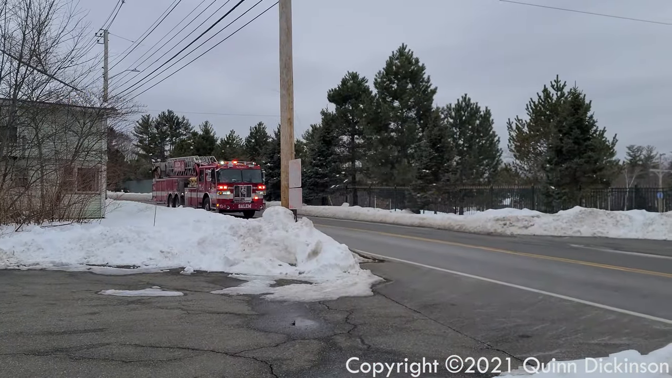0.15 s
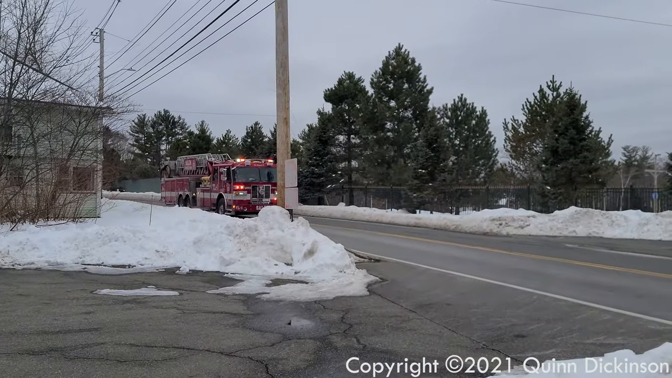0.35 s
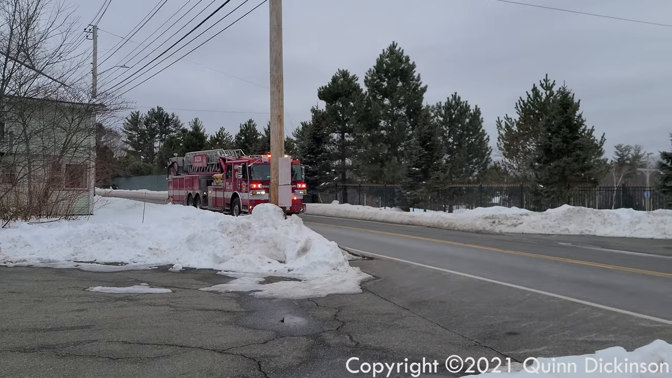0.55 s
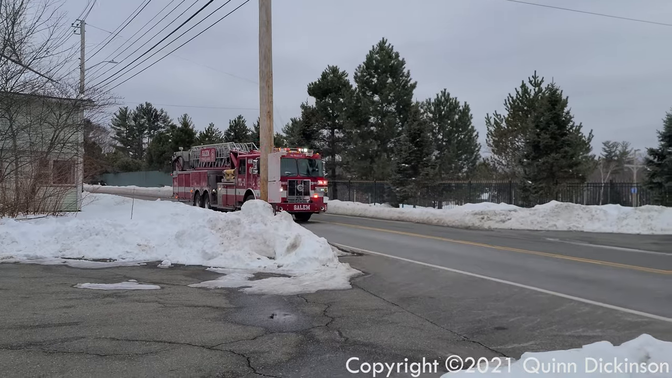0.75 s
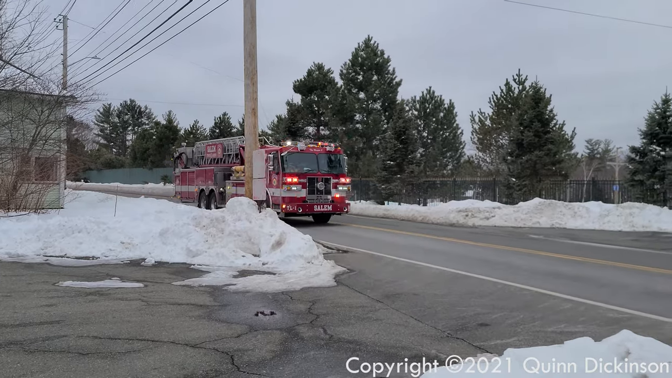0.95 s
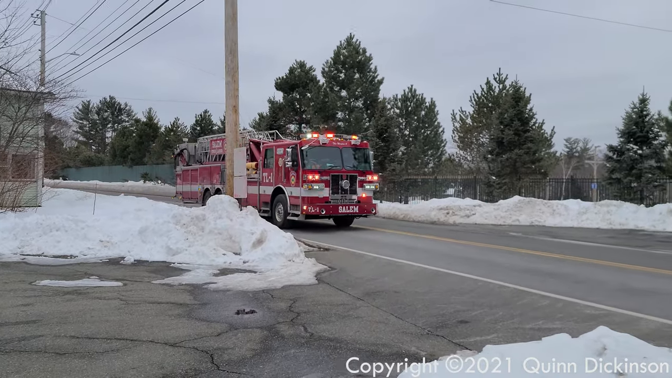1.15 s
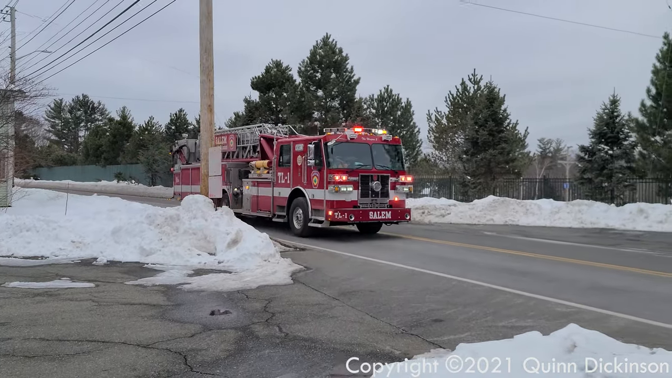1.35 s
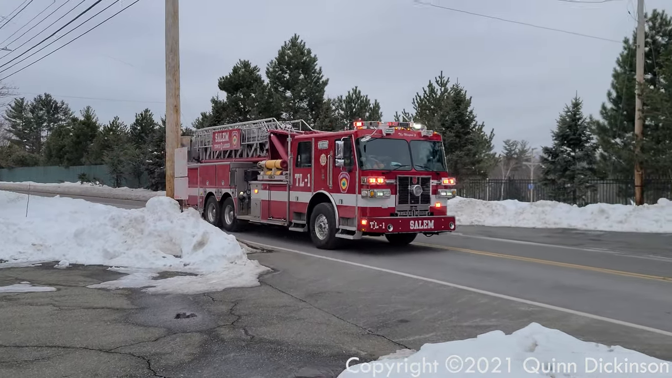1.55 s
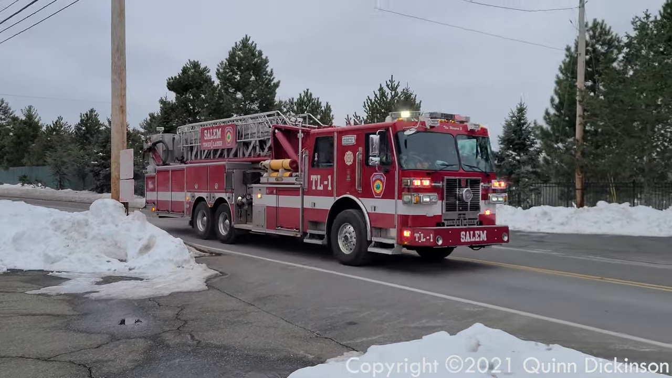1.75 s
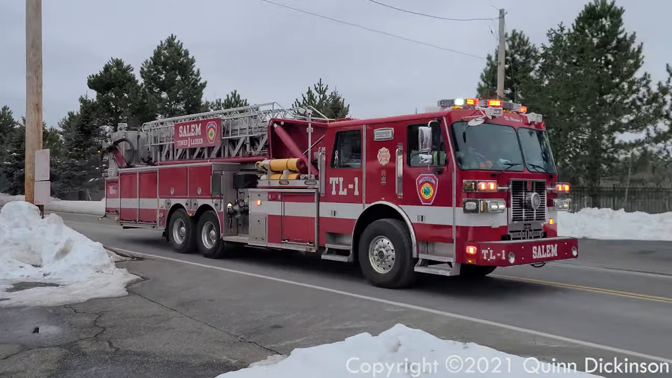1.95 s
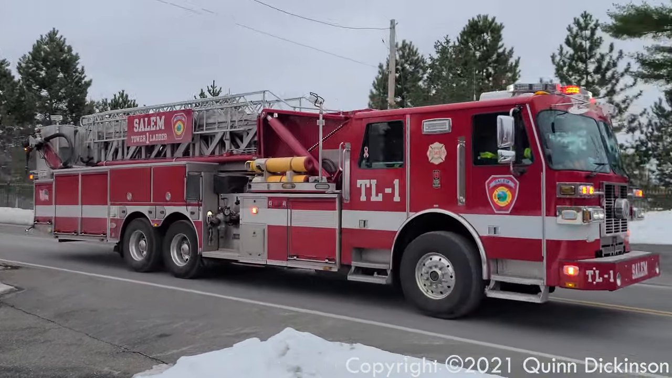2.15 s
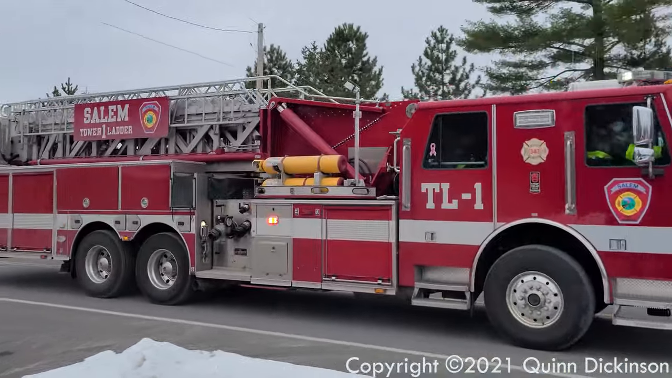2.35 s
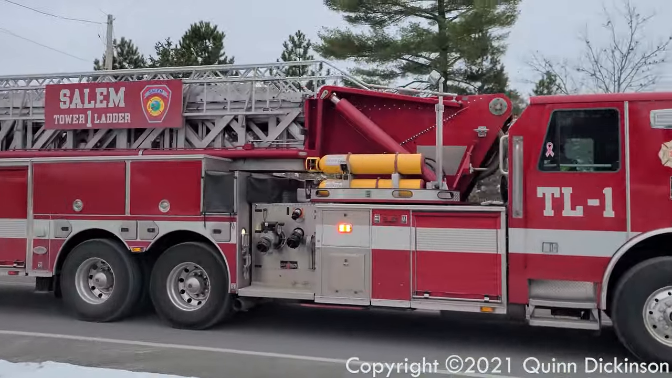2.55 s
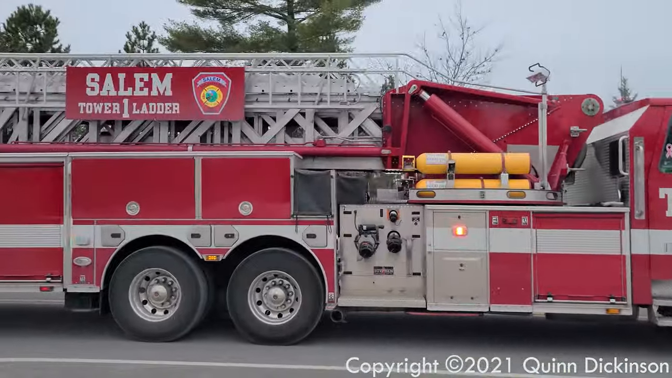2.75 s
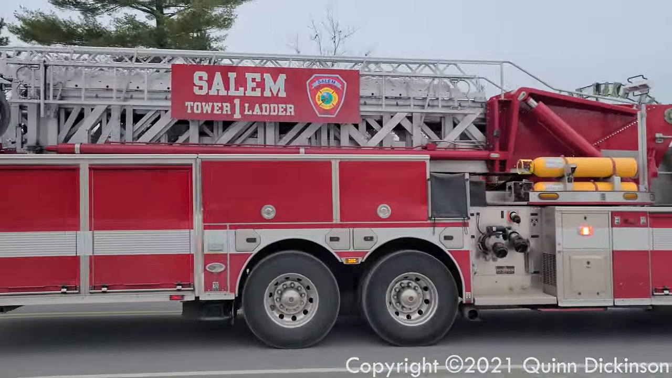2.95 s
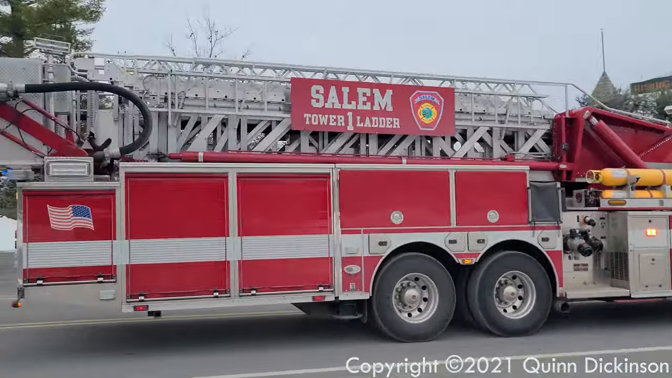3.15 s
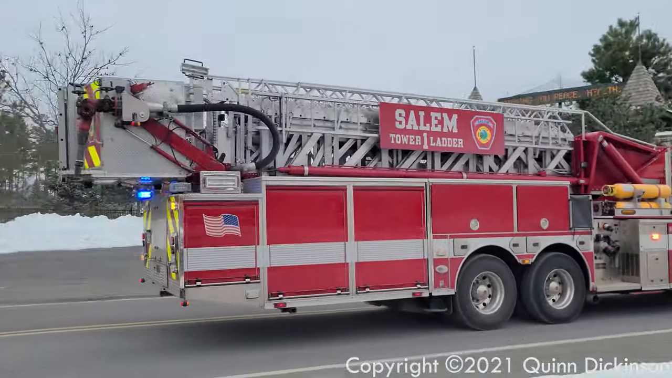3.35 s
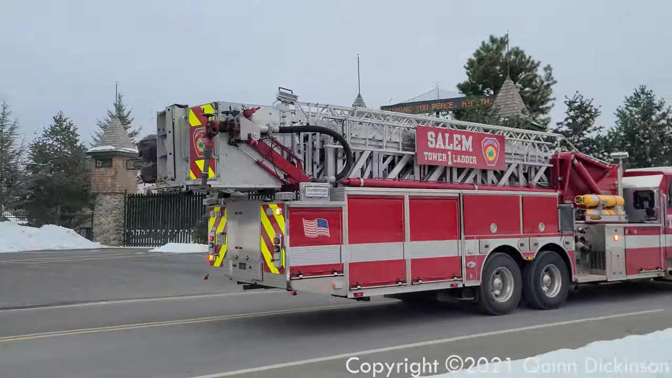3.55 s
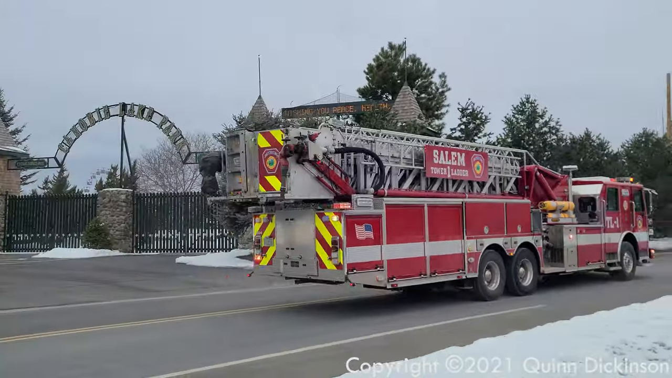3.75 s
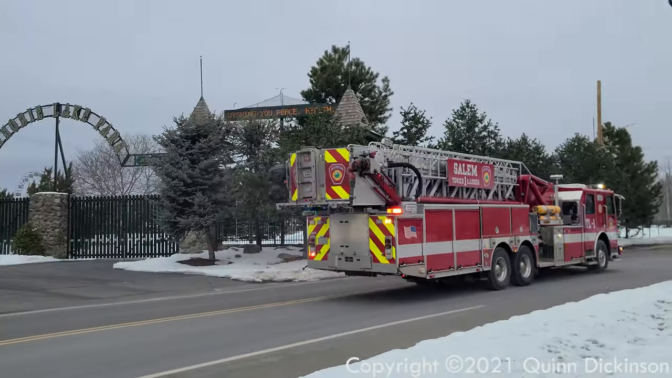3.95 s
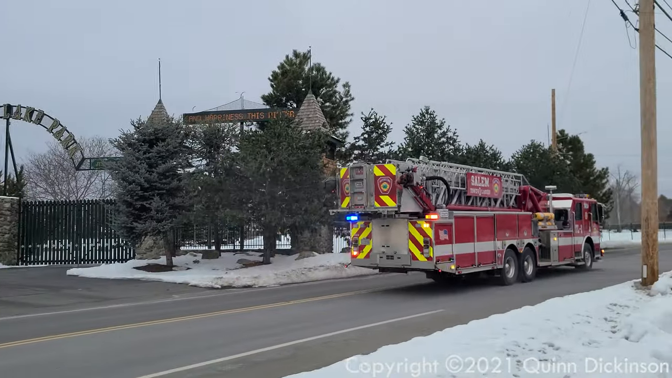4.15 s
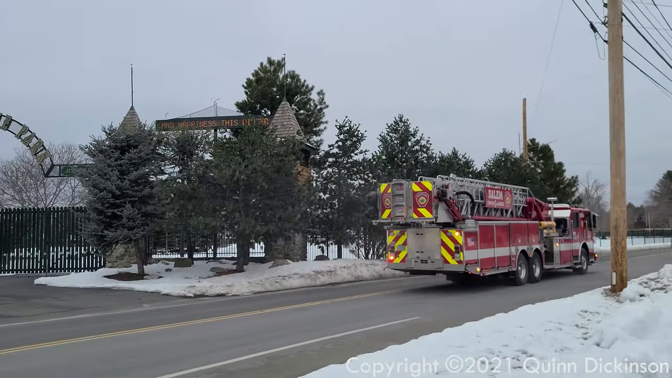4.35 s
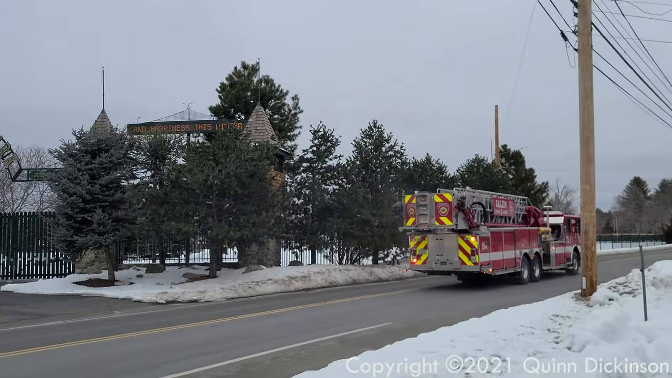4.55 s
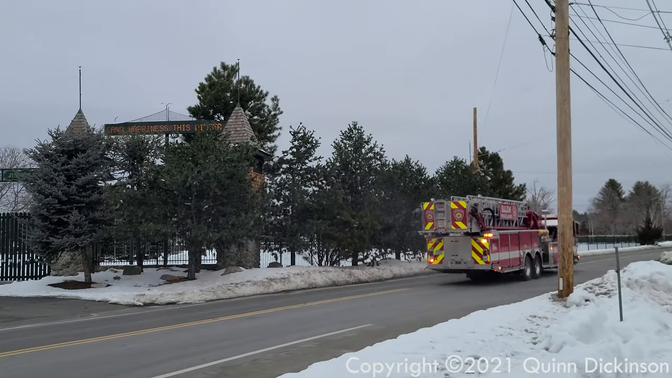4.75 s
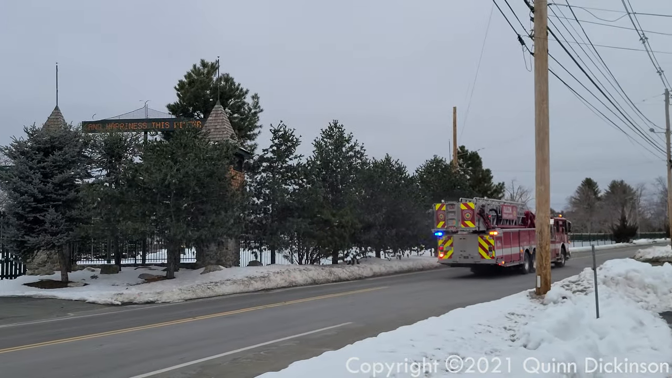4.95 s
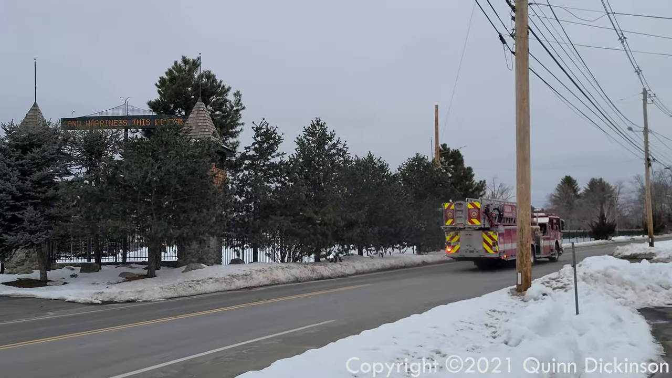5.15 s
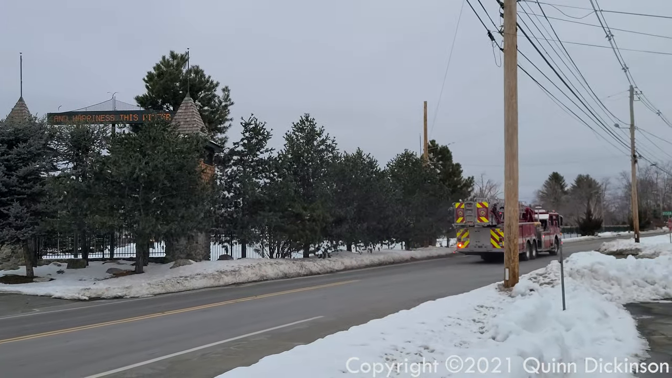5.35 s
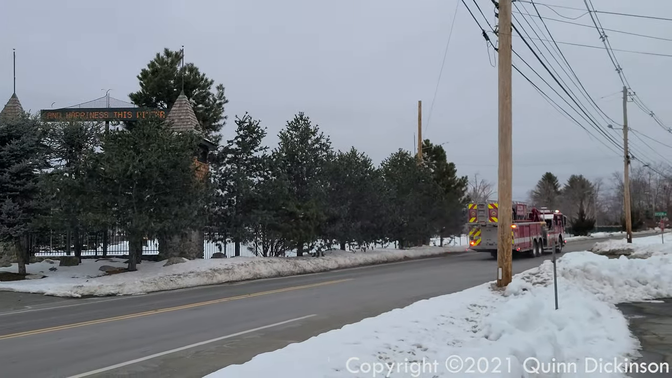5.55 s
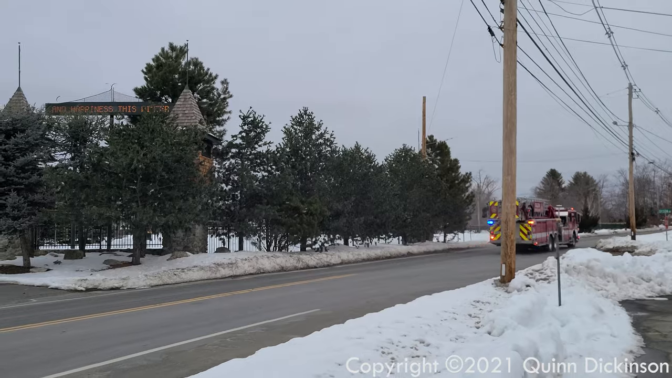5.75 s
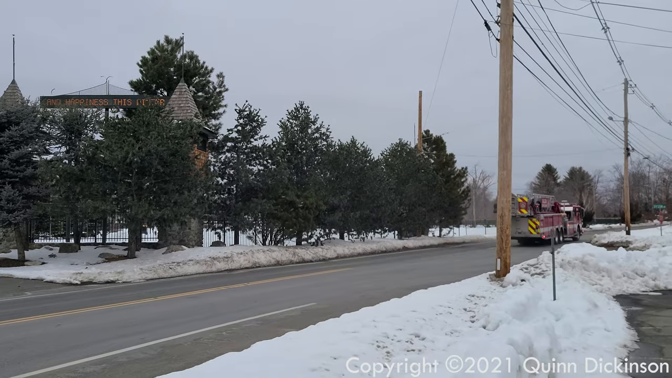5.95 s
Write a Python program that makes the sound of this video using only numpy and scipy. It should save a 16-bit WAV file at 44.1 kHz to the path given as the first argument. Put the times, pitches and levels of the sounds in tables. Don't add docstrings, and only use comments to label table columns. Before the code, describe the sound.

A heavy diesel truck comes up a cold, open road, faint at first, then swells quickly into a broad tyre roar with humming tread tones, low engine drone and wet hiss. It passes close in the middle, axles thumping softly, pitch sagging slightly, then recedes to a thin distant hum. No siren is heard. A small handheld stereo microphone outdoors picks up a few tiny casing ticks.

```python
import sys
import numpy as np
from scipy import signal
from scipy.io import wavfile
from scipy.ndimage import uniform_filter1d

SR = 44100
rng = np.random.default_rng(int(sys.argv[2]) if len(sys.argv) > 2 else 0)


def amplitude_ratio(level_db):
    exponent = np.asarray(level_db, float) / 20
    return 10 ** exponent


def log_audio(samples):
    frames = np.atleast_2d(samples).T
    limited = np.clip(frames, -1, 1)
    pcm = np.round(limited * 32767).astype(np.int16)
    wavfile.write(sys.argv[1], SR, pcm)


N = 268965
FRAME, HOP = 1024, 256

# time in seconds, level in dB.
NEARNESS = [(0, -41), (.3, -40.5), (.6, -38.5), (.88, -38.5), (1.12, -31), (1.29, -28.5), (1.35, -24),
            (1.8, -22), (2.3, -21), (2.7, -21.5), (3.0, -22.5), (3.25, -23), (3.9, -28.5), (4.42, -33.5),
            (4.85, -36), (5.1, -37.5), (5.5, -40.5), (6.1, -40)]
# frequency in Hz, density in dB per Hz.
ROAR_FACES = [
    [(130, -35), (220, -29), (296, -15.5), (387, -9), (435, -7), (592, -13), (680, -14.5), (1330, -3.5),
     (1430, -4), (2800, -35.5), (3640, -76), (6160, -120)],
    [(130, -34), (220, 8.5), (237, 8), (340, -4), (387, -2), (478, -7), (592, -4.5), (709, -8.5), (906, -9),
     (1020, -7.5), (1480, -12), (1810, -12), (2800, -18.5), (3640, -51), (6160, -120)],
    [(130, -44), (220, -27), (383, -14.5), (505, -6), (605, -9), (694, -3.5), (976, -4.5), (1050, -4.5),
     (2010, -6.5), (2800, -24), (3640, -48), (6160, -120)],
]
# dB per dB of nearness, lag in s, smear in s, then dB at middle nearness for front, side, tail.
RUMBLE = (1.12, -0.33, 0.96, -59, -44.5, -45.5)
# time in seconds, level in dB, half length in seconds.
RUMBLE_THUMPS = [
    (1.85, -39, 0.032),
    (2.1, -45, 0.35),
    (2.39, -50, 0.056),
    (2.71, -40, 0.06),
    (3.1, -37, 0.28),
    (3.87, -57, 0.038),
    (4.24, -53, 0.033),
]


def tyre_roar(hz, t):
    colour = faces(ROAR_FACES, hz, t)
    rumble_db = swell(led(RUMBLE, t), RUMBLE_THUMPS, t)
    roar_db = follow(NEARNESS, t)[0]
    up = np.clip((hz[:, None] - 330) / 250, 0, 1)
    rumble_gain = band(colour, hz, 220, 350, rumble_db)
    roar_gain = band(colour, hz, 650, 2500, roar_db)
    return colour + (1 - up) * rumble_gain + up * roar_gain


# frequency in Hz, density in dB per Hz.
HISS_FACES = [
    [(1410, -47), (2400, -28), (2760, -5.5), (3040, -1), (4060, 2), (5600, -16.5), (6010, -14),
     (7540, -12.5), (8550, -14.5), (9390, -30), (11000, -21), (12200, -29), (15600, -26)],
    [(1410, -30), (2400, 0), (2500, -1), (3520, -10.5), (3810, -14.5), (4750, -8), (6200, -13), (7360, -11),
     (9460, -15.5), (12000, -12.5), (13400, -18), (15600, -22)],
    [(1410, -29), (2400, 4), (2900, -10), (3550, -17), (3930, -21.5), (4060, -18), (5640, -20), (6340, -20),
     (7190, -25), (8610, -24), (11300, -23), (13900, -28), (15600, -32)],
]
# dB per dB of nearness, lag in s, smear in s, then dB at middle nearness for front, side, tail.
HISS = (1.2154, 0.0124, 0.33, -41, -42, -44.5)
AIR = (1.28, 0.18, 0.7, -60, -54, -65.5)
# time in seconds, air level in dB, half length in seconds.
SPRAY = [
    (.85, -82, .08),
    (1.1, -70, 0.053),
    (1.42, -61, 0.049),
    (1.85, -60, 0.055),
    (2.65, -58.5, 0.23),
    (3.2, -59, 0.028),
    (4.1, -81, 0.11),
    (4.5, -84, 0.063),
    (5.04, -77, 0.052),
    (5.3, -81, 0.15),
]
SPRAY_HISS_DB = 9.5
# frequency in Hz, width in Hz, lift in dB.
PORT_RING = (7220, 320, 1.7)


def tyre_hiss(hz, t):
    colour = faces(HISS_FACES, hz, t)
    ring_hz, width_hz, ring_db = PORT_RING
    tail = np.clip(heard_face(t) - 1, 0, 1)
    colour = colour + ring_db * (1 + tail) * np.exp(-((hz[:, None] - ring_hz) / width_hz) ** 2)
    hiss_db = swell(led(HISS, t) - SPRAY_HISS_DB, SPRAY, t) + SPRAY_HISS_DB
    air_db = swell(led(AIR, t), SPRAY, t)
    up = np.clip((hz[:, None] - 8000) / 1200, 0, 1)
    hiss_gain = band(colour, hz, 2600, 8500, hiss_db)
    air_gain = band(colour, hz, 8500, 15500, air_db)
    return colour + (1 - up) * hiss_gain + up * air_gain


TREAD_MULTIPLES = (1, 2, 3, 5)
# time in seconds, block rate in Hz.
FRONT_RATE = [(0, 195.3), (.85, 194.8), (1.33, 194.3), (1.52, 195.3), (1.9, 194.3), (2.3, 193.5),
              (2.66, 190.3), (2.95, 189), (3.3, 187.3), (3.7, 187.1), (4.6, 190.4), (6.1, 190.6)]
# dB against the nearness with front, side, tail heard.
FRONT_STEADY = [
    (4.5, -19, -17.5),
    (-27, -16, -18),
    (-2, -20.5, -12.5),
    (-16, -31, -30),
]
# time in seconds, level in dB, half length in seconds.
FRONT_SWELLS = [
    [(.3, -42, 0.055), (.68, -39.5, 0.15), (.92, -31.5, 0.15), (1.15, -33, 0.048), (1.28, -36, 0.044),
     (1.47, -25.5, 0.086), (1.74, -27.5, 0.078), (1.97, -31.5, 0.075), (2.5, -27.5, 0.074),
     (2.82, -30, 0.24), (3.37, -34.5, 0.051)],
    [(.72, -44, 0.1), (1.17, -36, 0.24), (1.65, -53, 0.087), (1.9, -48, 0.074), (2.4, -36, 0.086),
     (2.7, -53, 0.3), (4.32, -58, 0.066)],
    [(.7, -38.5, 0.11), (.9, -30, 0.028), (1.35, -27, 0.14), (1.85, -46, 0.15), (2.4, -48, 0.086),
     (2.72, -30, 0.066), (2.95, -25, 0.069), (3.1, -37, 0.067), (3.63, -33.5, 0.044), (4.18, -44, 0.062)],
    [(1.36, -28.5, 0.096), (1.65, -32, 0.051), (1.92, -24, 0.065), (2.85, -49, 0.066), (3.17, -37.5, 0.14),
     (3.85, -41, 0.17)],
]


def front_treads(t):
    near_db, block_hz = follow(NEARNESS, t)[0], follow(FRONT_RATE, t)[0]
    out = np.zeros(N)
    for k, steady, swells in zip(TREAD_MULTIPLES, FRONT_STEADY, FRONT_SWELLS):
        level_db = swell(near_db + by_face(steady, t), swells, t) + 0.078
        out += tone(k * block_hz, level_db, rough=np.minimum(0.081 * k ** 2, 0.6), width_hz=6 + 3 * k)
    return out


# time in seconds, block rate in Hz.
REAR_RATE = [(0, 203.8), (1.33, 205.5), (1.75, 206.6), (2.2, 206.6), (2.55, 205.5), (2.93, 202.8),
             (3.45, 199.3), (4.4, 199.8), (5.2, 200), (6.1, 199.6)]
# dB against the nearness with front, side, tail heard.
REAR_STEADY = [
    (-14, -19, -18.5),
    (-36, -37, -12.5),
    (-13, -15.5, -14.5),
    (1, -22, -20),
]
# time in seconds, level in dB, half length in seconds.
REAR_SWELLS = [
    [(.45, -60.5, 0.24), (.9, -38.5, 0.33), (1.75, -40, 0.088), (2.3, -34, 0.069), (2.88, -27, 0.2),
     (3.15, -43, 0.035), (3.52, -39, 0.07), (4.02, -67, 0.12)],
    [(1.17, -39, 0.12), (1.65, -42, 0.14), (2.08, -34, 0.05), (2.66, -34, 0.26), (3.0, -35, 0.15),
     (3.42, -41, 0.12), (4.3, -46, 0.084), (4.6, -52, 0.094)],
    [(1.82, -28, 0.032), (1.94, -28, 0.026), (2.35, -59, 0.42), (2.88, -24.5, 0.042), (3.13, -31.5, 0.06),
     (3.57, -28, 0.082), (3.74, -33.5, 0.068), (4.17, -50, 0.058), (5.15, -50.5, 0.17)],
    [(1.2, -44, 0.033), (1.7, -33.5, 0.15), (1.89, -29, .06), (2.05, -29.5, 0.098), (2.22, -26, 0.077),
     (2.5, -43, .08), (2.88, -30.5, 0.07), (3, -31, 0.066), (3.4, -34.5, 0.2), (4.55, -47, 0.21),
     (5.0, -51, 0.25), (5.55, -46, 0.28), (6.0, -49, 0.32)],
]


def rear_treads(t):
    near_db, block_hz = follow(NEARNESS, t)[0], follow(REAR_RATE, t)[0]
    close = np.clip(2.04 - heard_face(t), 0, 1)
    out = np.zeros(N)
    for k, steady, swells in zip(TREAD_MULTIPLES, REAR_STEADY, REAR_SWELLS):
        level_db = swell(near_db + by_face(steady, t), swells, t) + 0.1
        out += tone(k * block_hz, level_db, rough=close * np.minimum(0.049 * k ** 2, 0.5), width_hz=6 + 4 * k)
    return out


# time in seconds, block rate in Hz.
MIDDLE_RATE = [(0, 197), (1.1, 198.3), (1.6, 198.7), (2.05, 198), (2.25, 196.5), (2.65, 193.5),
               (2.9, 192.5), (6.1, 191)]
# time in seconds, level in dB, half length in seconds.
MIDDLE_SWELLS = [
    [(1.1, -50, .1), (1.72, -33, 0.07), (2.04, -32.5, 0.14), (2.7, -49, 0.18)],
    [(1.04, -33, 0.11), (1.63, -34, 0.06), (1.8, -25, .05), (2.03, -23, 0.065), (2.12, -40, 0.047),
     (2.2, -25, 0.055), (2.45, -31.5, 0.065), (2.62, -25, 0.067), (2.85, -29, 0.025)],
    [(1.558, -30, 0.075)],
    [(.95, -49, .1), (1.19, -32.5, 0.057), (1.43, -35, 0.058), (2.03, -23.5, 0.055), (2.3, -41, 0.061)],
]


def middle_treads(t):
    base_db, block_hz = follow(NEARNESS, t)[0] - 31, follow(MIDDLE_RATE, t)[0]
    out = np.zeros(N)
    for k, swells in zip((2, 3, 4, 5), MIDDLE_SWELLS):
        out += tone(k * block_hz, swell(base_db, swells, t), rough=0.256, width_hz=10.0)
    return out


# time in seconds, firing rate in Hz.
FIRING_RATE = [(0, 65.5), (1.3, 65.3), (2.7, 65.1), (3.15, 62.8), (4.3, 62.5), (4.45, 63.6), (5.35, 63.5),
               (6.1, 63.3)]
# time in seconds, firing tone level in dB.
ENGINE_LOAD = [(0, -68), (.55, -61), (.9, -46.5), (1.5, -41), (1.8, -39), (2.15, -34.5), (2.42, -30.5),
               (2.64, -31.5), (2.9, -26), (3.5, -32.5), (3.95, -37), (4.18, -45), (4.4, -37), (4.65, -46.5),
               (5.0, -44), (5.3, -50), (5.6, -49), (6.1, -54)]
# time in seconds, level in dB, half length in seconds.
SECOND_SWELLS = [
    (1.76, -57, 0.1),
    (1.98, -37.5, 0.17),
    (2.3, -32.5, 0.13),
    (2.6, -37, 0.13),
    (3.15, -43, 0.18),
]
# time in seconds, level in dB, half length in seconds.
TENTH_SWELLS = [
    (1.754, -29, 0.035),
    (1.933, -29, 0.038),
    (2.2, -39, 0.069),
    (2.42, -31.5, .1),
]


def engine(t):
    fire_hz, fire_db = follow(FIRING_RATE, t)[0], follow(ENGINE_LOAD, t)[0]
    second_db = swell(fire_db - 24, SECOND_SWELLS, t)
    tenth_db = swell(follow(NEARNESS, t)[0] - 30, TENTH_SWELLS, t)
    out = tone(fire_hz, fire_db + 0.091, rough=0.08, width_hz=16.0)
    out += tone(2 * fire_hz, second_db + 0.091, rough=0.08, width_hz=16.0)
    return out + tone(10 * fire_hz, tenth_db, rough=0.35, width_hz=34.0)


# time in seconds, pitch in Hz.
GEAR_PITCH = [(0, 552), (1.1, 550), (1.4, 543), (2.4, 543), (2.7, 529), (3.3, 523), (3.6, 522), (4.5, 505),
              (6.1, 504)]
# time in seconds, level in dB, half length in seconds.
GEAR_SWELLS = [
    (1.4, -46, 0.13),
    (1.62, -30, 0.15),
    (2.08, -33, 0.058),
    (2.35, -51, 0.13),
    (2.75, -39, 0.06),
    (3.4, -36.5, 0.18),
]


def gear_whine(t):
    level_db = swell(follow(NEARNESS, t)[0] - 22.5, GEAR_SWELLS, t)
    return tone(follow(GEAR_PITCH, t)[0], level_db, rough=0.1, width_hz=5.0)


# time in seconds, pitch in Hz, level in dB, half length in seconds.
BOOM = (2.96, 207, -24, .13)


def axle_boom(t):
    s, boom_hz, boom_db, half = BOOM
    return tone(boom_hz + 0 * t, boom_db, rough=0.029, width_hz=11.0) * np.exp(-((t - s) / half) ** 2)


# time in seconds, pitch in Hz.
TURBO_PITCH = [(0, 10900), (1, 11100), (1.7, 11600), (2.1, 12350), (2.5, 13100), (3, 13500), (3.6, 13850),
               (4.3, 14180), (5.2, 14250), (6.1, 14050)]
# time in seconds, level in dB, half width in Hz.
BOOST = [(0, -74, 600), (.8, -79, 600), (1.2, -61, 600), (1.8, -47, 500), (2.2, -50, 302), (2.6, -50, 250),
         (3.2, -55, 320), (3.8, -59, 300), (4.4, -70, 202), (5.2, -79, 250), (6.1, -85, 250)]


def turbo_whistle(hz, t):
    turbo_hz = follow(TURBO_PITCH, t)[0]
    level_db, half_hz = follow(BOOST, t)
    whistle = np.exp(-((hz[:, None] - turbo_hz) / half_hz) ** 2)
    return amplitude_ratio(level_db) ** 2 * whistle / whistle.sum(0)


# dB per dB of nearness, lag in s, smear in s, then dB at middle nearness for front, side, tail.
WASH = (0.87, 0.45, 1.7, -38.5, -42, -46)
# frequency in Hz, density in dB per Hz.
WASH_COLOUR = [(10, -30), (22, -14), (35, -9), (50, 2), (80, 7.5), (105, -24.5), (150, -7.5), (215, 8),
               (300, -40)]
# time in seconds, level in dB, half length in seconds.
WASH_THUMPS = [(0.236, -56, 0.046), (0.744, -47, .05), (1.42, -51, 0.091), (3.152, -50, 0.074),
               (5.3, -55, 0.07), (5.705, -49, .06), (1.106, -48, 0.086), (1.556, -46, 0.079),
               (3.705, -59, 0.041), (3.95, -47, 0.032), (1.877, -40, 0.033), (2.07, -41, 0.1),
               (2.287, -29.5, 0.068), (2.543, -31, 0.093), (2.847, -36, 0.098), (5.923, -49, 0.075)]


def exhaust_wash(hz, t):
    wash_db = swell(led(WASH, t), WASH_THUMPS, t)
    colour = read(WASH_COLOUR, hz)[:, None] + 0 * t
    return colour + band(colour, hz, 75, 175, wash_db)


# pitch in Hz, level in dB.
IDLE = [
    (54, -49.5),
    (105, -53.5),
]


def distant_idle(t):
    return sum(tone(idle_hz + 0 * t, db, rough=0.38, width_hz=4.0) for idle_hz, db in IDLE)


# time in seconds, level in dB, pitch in Hz.
TICKS = [
    (.55, -48, 2950),
    (.548, -48, 3620),
    (4.985, -66, 12500),
    (4.985, -66, 13800),
    (5.579, -58, 13230),
    (5.693, -60, 13480),
    (5.798, -62, 13500),
    (5.854, -63, 13660),
    (5.935, -60, 9500),
    (6.04, -63, 13550),
]


def ticks():
    t, out = np.arange(N) / SR, np.zeros(N)
    for s, db, hz in TICKS:
        bell = amplitude_ratio(db) * np.exp(-((t - s) / 0.0033) ** 2)
        out += bell * (np.exp(2j * np.pi * hz * t) * drift(580)).real
    return out * amplitude_ratio(np.array([[-12], [4]]))


def road():
    hz, t = np.fft.rfftfreq(FRAME, 1 / SR), np.arange(N // HOP + 2) * HOP / SR
    column = hz[:, None]
    tyres_db = np.where(column < 2600, tyre_roar(hz, t), tyre_hiss(hz, t))
    power = amplitude_ratio(tyres_db) ** 2 * (column > 215) + amplitude_ratio(exhaust_wash(hz, t)) ** 2 * (column < 215)
    power = power * amplitude_ratio(fringes(hz, t)) ** 2 + turbo_whistle(hz, t)
    a, b, c, d, patches, streaks = rng.standard_normal((len(t), len(hz), 6)).T
    streaks = uniform_filter1d(streaks, size=2, axis=0)
    streaks = evened(uniform_filter1d(streaks, size=24, axis=1))
    patches = uniform_filter1d(patches, size=14, axis=0)
    patches = evened(uniform_filter1d(patches, size=10, axis=1))
    gusts = evened(uniform_filter1d(rng.standard_normal(len(t)), size=5))
    treble = np.clip(column / 9000, 0, 1)
    texture_db = (0.5 + 0.12 * treble) * patches + 1.66 * streaks
    texture_db = 0.92 + np.clip(column / 1500, .3, 1) * texture_db + (0.49 + 0.14 * treble) * gusts
    size = np.sqrt(power) * amplitude_ratio(texture_db)
    return ports(size * (a + 1j * b), size * (c + 1j * d), hz, t)


def machinery():
    t = np.arange(N) / SR
    out = front_treads(t) + rear_treads(t) + middle_treads(t)
    out += engine(t) + gear_whine(t) + axle_boom(t) + distant_idle(t)
    hz, t, z = signal.stft(out, SR, nperseg=FRAME, noverlap=FRAME - HOP)
    turns = uniform_filter1d(rng.standard_normal(z.shape), size=4, axis=1)
    return ports(z, z * np.exp(2j * np.pi * turns), hz, t)


# middle in seconds, half length in seconds, pitch in Hz, slide in Hz per second, lift in dB.
FRINGES = [(4.17, 0.63, 696, 2, -15), (5.4, 1, 680, -22, -4), (5.9, 0.57, 790, -40, 3.5),
           (2, 0.2, 880, 33, 3.5), (2.76, 0.33, 1356, 3, 7.5), (2.4, 0.81, 1475, 45, -6.5),
           (1.66, 0.22, 1550, 0, 5.5), (2.28, 0.31, 1830, -40, 5.5), (3.8, 0.48, 1576, -8, 6),
           (4.6, 0.38, 1470, 0, 4), (0.26, 0.38, 1940, -100, 1.5), (0.76, 0.4, 1800, 3, 0.5),
           (3.93, 0.19, 2060, 3, 5.5), (2.16, .4, 2245, 50, 6), (1.1, 0.66, 2500, 30, -7),
           (4.1, 0.39, 2470, 0, 4.5), (1.43, 0.41, 2880, 0, -8.5), (2.97, 0.43, 5040, 0, -6),
           (3.96, 0.57, 5620, 197, 4.5), (0.2, .3, 5580, 0, -4), (1.3, 0.34, 5500, 200, -6),
           (4.26, 0.36, 7300, -3, 4), (0.18, 0.32, 5600, 0, 3), (1.25, 0.22, 4500, 0, 0),
           (1.47, .55, 6200, 450, -7), (0.23, .35, 6440, 0, 6), (1.46, 0.14, 6800, 509, 5.5),
           (4.48, 0.25, 7100, 0, 5), (5.2, .3, 7400, 0, 6.5), (3.4, 0.32, 8250, 0, -9),
           (2.8, 0.3, 8850, 0, -3), (4.1, .5, 8750, 0, 0), (1.35, 0.34, 8500, 300, 3),
           (0.65, 0.44, 8700, -200, -9), (1.6, 0.51, 9300, 300, 5), (3.1, 0.46, 10800, 0, 3),
           (.3, .3, 16000, 3, 3), (1.53, .2, 5550, 300, 6), (2.8, .9, 9400, 0, 1.5), (5.8, 1, 3140, -3, 1)]


def fringes(hz, t):
    out = np.zeros((len(hz), len(t)))
    for s, half, mid_hz, slide, db in FRINGES:
        width_hz = 0.056 * mid_hz * (mid_hz / 1000) ** -0.098
        when = ((t - s) / half) ** 2 * abs((t - s) / half)
        where = ((hz[:, None] - mid_hz - slide * (t - s)) / width_hz) ** 2
        out += db * np.exp(-when - where)
    return out


# time in seconds, face heard (0 front, 1 side, 2 tail),
# lag of the left port in samples, likeness factor of the ports.
BEARING = [
    (0, 0.43, -5, 0.63),
    (.8, 0.49, -3.5, 0.79),
    (1.5, 0.71, -0.5, 1.02),
    (2.2, 0.8, 2.5, 0.76),
    (3, 1.14, 9.5, 0.93),
    (3.7, 1.19, 3.5, 0.81),
    (4.6, 1.77, 3.5, 0.85),
    (6.1, 1.5, 7, 0.59),
]


def heard_face(t):
    return follow(BEARING, t)[0]


# frequency in Hz, likeness from 0 to 1.
LIKENESS = [(60, 1), (150, 1), (300, 0.99), (600, 0.94), (950, 0.81), (1500, 0.63), (2380, 0.71),
            (5980, 0.047), (15000, 0.2)]
# frequency in Hz, left minus right in dB.
LEAN = [
    [(60, -2), (200, -5), (700, -6), (1700, -10), (2200, -3), (2800, 12), (4200, -27), (5500, 3),
     (7200, -9), (8300, 0), (9000, 6), (10700, -21), (12700, -16), (15700, -8)],
    [(60, -4.8), (200, -3.5), (700, -6), (2000, -12), (3200, -3), (3800, 2), (4400, -8.5), (5700, -6.5),
     (6700, -3), (7200, -3.5), (8300, 7.5), (9100, -9), (10500, -13), (12800, -12.5), (15700, -16)],
]


def ports(z, other, hz, t):
    face, lag, alike = follow(BEARING, t)
    same = np.clip(read(LIKENESS, hz)[:, None], 0, 1) ** (1 / np.clip(alike, .2, 3)) ** 2
    left = z * np.exp(-2j * np.pi * hz[:, None] * lag / SR)
    right = same * z + np.sqrt(1 - same ** 2) * other
    ahead, beside = (read(colour, hz)[:, None] for colour in LEAN)
    lean = amplitude_ratio(ahead + (beside - ahead) * np.clip(face, 0, 1))
    even = 2 / np.sqrt(1 + lean ** 2 + 2 * same * lean)
    pair = [left * lean * even, right * even]
    return signal.istft(pair, nperseg=FRAME, noverlap=FRAME - HOP)[1][:, :N]


def led(layer, t):
    slope, lag, smear, *face_db = layer
    spots = [follow(NEARNESS, t - lag + smear * u)[0] for u in np.linspace(-1, 1, 9)]
    middle_db = -30
    return slope * (np.mean(spots, axis=0) - middle_db) + by_face(face_db, t)


def by_face(values, t):
    return np.interp(heard_face(t), np.arange(3), values)


def faces(spectra, hz, t):
    face = np.clip(heard_face(t), 0, 2)
    weights = np.clip(1 - abs(face - np.arange(3)[:, None]), 0, 1)
    return np.transpose([read(s, hz) for s in spectra]) @ weights


def swell(base_db, rows, t):
    bells = sum(amplitude_ratio(db) * np.exp(-((t - s) / half) ** 2) for s, db, half in rows)
    return np.log10(amplitude_ratio(base_db) + bells) * 20


def band(colour_db, hz, lo_hz, hi_hz, level_db):
    inside = (hz >= lo_hz) & (hz < hi_hz)
    return level_db - 10 * np.log10((amplitude_ratio(colour_db[inside]) ** 2).sum(0))


def tone(hz, db, rough, width_hz):
    rough = np.clip(rough, 0, 1)
    carrier = np.exp(2j * np.pi * (np.cumsum(hz) / SR + rng.random()))
    flutter = np.sqrt(1 - rough) + np.sqrt(rough) * drift(width_hz)
    return np.sqrt(2) * amplitude_ratio(db) * (carrier * flutter).real


def drift(width_hz):
    hz = np.fft.fftfreq(N, 1 / SR)
    z = rng.standard_normal(N) + 1j * rng.standard_normal(N)
    return evened(np.fft.ifft(z * np.exp(-(hz / width_hz) ** 2)))


def evened(x):
    return x / np.sqrt(np.mean(abs(x) ** 2) + 1e-20)


def read(points, hz):
    f, value = np.transpose(points)
    return np.interp(np.log(hz + 1), np.log(f + 1), value)


def follow(rows, t):
    s, *columns = np.transpose(rows)
    return [np.interp(t, s, c) for c in columns]


def scene():
    return road() + machinery() + ticks()


def roll_off(x):
    return signal.sosfilt(signal.butter(12, 15780, fs=SR, output="sos"), x)


def record(dry):
    bass_cut = signal.butter(2, 30, "high", fs=SR, output="sos")
    mix = signal.sosfilt(bass_cut, dry)
    return roll_off(mix)


dry = scene()
out = record(dry)
log_audio(out)
```